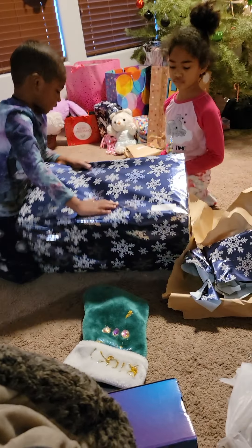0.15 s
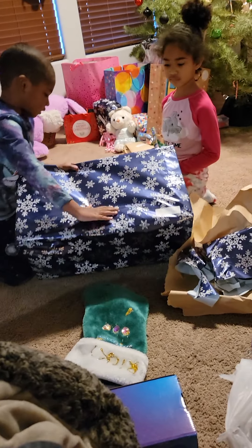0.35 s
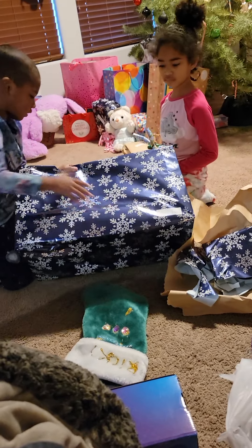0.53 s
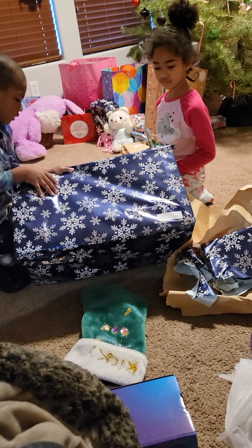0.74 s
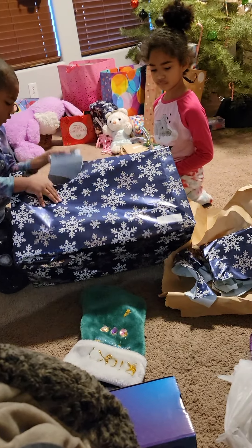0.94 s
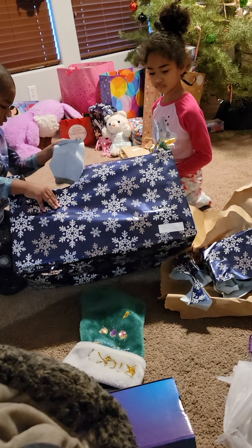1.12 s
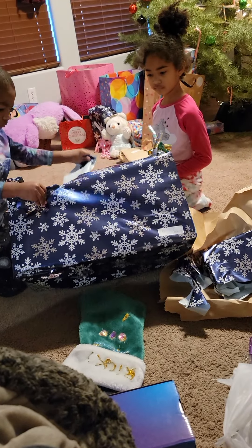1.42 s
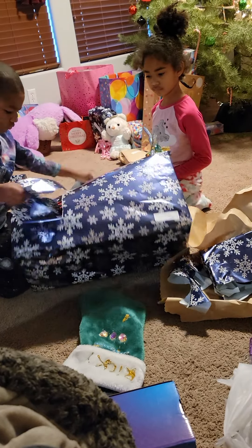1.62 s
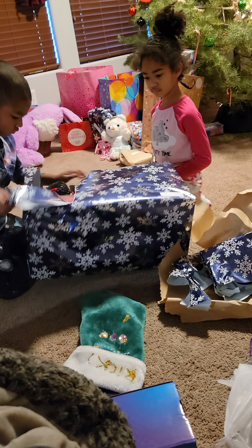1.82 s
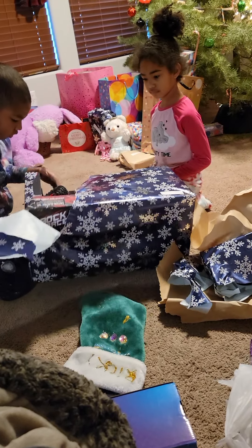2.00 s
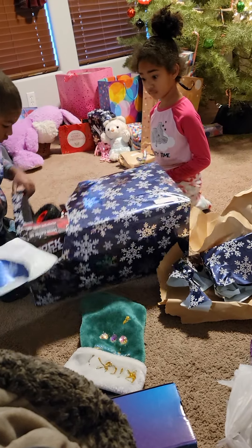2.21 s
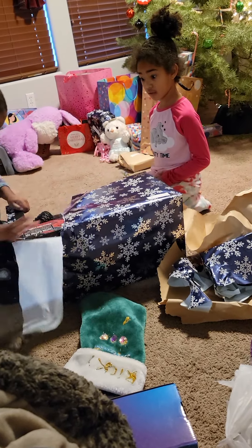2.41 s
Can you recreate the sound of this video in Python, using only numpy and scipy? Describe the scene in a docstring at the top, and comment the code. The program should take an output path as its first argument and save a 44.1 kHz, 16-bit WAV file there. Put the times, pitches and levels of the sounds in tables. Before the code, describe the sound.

Glossy wrapping paper crinkles in short, uneven grabs with sharp ticks. At about 1 second comes a loud rip with a hollow thump from the cardboard box, then a smaller tear at 1.3. Another loud rip and thump land at 1.7, followed by a longer, softer rasping tear from 1.9 to 2.1. The loose sheet flaps softly, and the crackling thins out by 2.5 in a carpeted living room.

```python
"""Glossy wrapping paper crinkles as it is gripped, then is ripped off a large cardboard box.
Each pull is a shower of tiny impulses: the sheet buckles (crackle), fibres and creases break (fizz),
and a running tear rasps by stick-slip. The same pulls drive the panels of the box, which drum
under the paper, and the loose sheet flaps. A carpeted living room reverberates briefly."""
import sys
import numpy as np
from scipy import signal
from scipy.fft import rfft, irfft, next_fast_len
from scipy.io import wavfile
from scipy.ndimage import uniform_filter1d

SR = 44100
rng = np.random.default_rng(int(sys.argv[2]) if len(sys.argv) > 2 else 0)


def write(x):
    x = np.atleast_2d(x).T
    wavfile.write(sys.argv[1], SR, np.round(np.clip(x, -1, 1) * 32767).astype(np.int16))


N = 112454
T = np.arange(N) / SR
FFT_SIZE = next_fast_len(2 * N)
HZ = np.maximum(np.arange(FFT_SIZE // 2 + 1) * SR / FFT_SIZE, 1)

# Spectral density of buckling paper: frequency_hz, level_db
CRACKLE_SPECTRUM = [(60, -62), (250, -21), (600, -6.5), (1100, 0.5), (1450, -9.5), (1800, 4), (2300, 2.5),
                    (2900, -0.5), (3900, 1.5), (5000, -4.5), (6500, -10), (9000, -14), (16000, -51)]


def from_db(db):
    """Amplitude ratio of a level in decibels."""
    return 10 ** (np.asarray(db) / 20)


def rms_one(x):
    """Normalisation to unit mean power."""
    return x / np.sqrt(np.mean(x ** 2) + 1e-20)


def at_hz(points, hz):
    """Interpolation of a table on a logarithmic frequency axis."""
    frequency, value = np.transpose(points)
    return np.interp(np.log(hz), np.log(np.maximum(frequency, 1)), value)


def colour(x, spectrum):
    """Minimum-phase filtering by a folded cepstrum; white input keeps its power."""
    cepstrum = irfft(np.log(rms_one(from_db(at_hz(spectrum, HZ)))), FFT_SIZE)
    cepstrum[1:FFT_SIZE // 2] *= 2
    cepstrum[FFT_SIZE // 2 + 1:] = 0
    return irfft(rfft(x, FFT_SIZE) * np.exp(rfft(cepstrum)), FFT_SIZE)[:N]


def ring(x, hz, t60_s):
    """Forced response of one damped resonator; white input keeps its power."""
    radius, angle = from_db(-60 / (t60_s * SR)), 2 * np.pi * hz / SR
    numerator = np.sqrt((1 - radius ** 2) / 2) * np.array([1, 0, -1])
    return signal.lfilter(numerator, [1, -2 * radius * np.cos(angle), radius ** 2], x + 1e-18)


def snaps(per_s, spread_db):
    """Shot noise: random impulses of uneven size over smooth friction noise, evened to steady power."""
    size = from_db(spread_db * np.minimum(rng.exponential(1, N), 4)) * rng.choice([-1, 1], N)
    impulses = rms_one(size * (rng.random(N) < per_s / SR))
    x = impulses + from_db(-6.5) * rng.standard_normal(N)
    return x / np.sqrt(uniform_filter1d(x * x, size=1400))


def burst(start_s, decay_s):
    """A dense cluster of micro-snaps merges into exponentially decaying noise."""
    age = T - start_s
    return rng.standard_normal(N) * (age >= 0) * np.exp(-np.abs(age) / decay_s)


def reflections():
    """Transfer function of one path: early scatter off box and floor, then a tail absorbed band by band."""
    # Reverberation time: frequency_hz, t60_s
    decay_times = [(100, .36), (500, 0.3), (2000, 0.32), (6000, 0.27), (15000, 0.22)]
    scatter_s, gap_s = 0.0023, 0.005
    t = T[:SR // 2]
    noise, tail = rfft(rng.standard_normal(len(t))), 0
    edges = np.r_[0, np.geomspace(200, SR / 2, num=9)]
    hz = np.arange(len(noise)) * SR / len(t)
    for low, high in zip(edges, edges[1:]):
        band = irfft(noise * (hz >= low) * (hz < high), len(t))
        tail = tail + band * from_db(-60 * t / at_hz(decay_times, (low + high) / 2))
    scatter = rng.standard_normal(len(t)) * np.exp(-t / scatter_s)
    path = rms_one(tail * (t > gap_s)) + from_db(1) * rms_one(scatter)
    return rfft(path, FFT_SIZE) / np.sqrt(len(t))


def living_room(x, wet, lag_s=0):
    """Direct and reflected sound reach the two channels, which differ in phase and level from band to band."""
    # Side against mid in the reflections: frequency_hz, level_db
    side_level = [(60, -28), (210, -24), (320, -7), (500, 0), (16000, 0)]
    # Phase lead of the left channel: frequency_hz, phase_rad
    left_lead = [(220, 0), (290, .25), (380, 1.0), (520, 2.3), (700, 2.5), (1100, 1.9), (2100, 2.1),
                 (3200, 2.9), (5500, 3.8), (9000, 7), (16000, 13)]
    # Left channel against right: frequency_hz, level_db
    left_level = [(60, 1.9), (150, 2.5), (350, -4.5), (700, 4), (1400, 0.5), (2600, -3.5), (5000, 2),
                  (9000, 3.5), (15000, 0.5)]
    sides, width = np.array([[1], [-1]]), from_db(at_hz(side_level, HZ))
    room = wet * (reflections() + sides * width * reflections()) / np.sqrt(1 + width ** 2)
    heard = rfft(x, FFT_SIZE) * (1 + room) / np.sqrt(1 + np.mean(np.abs(room) ** 2))
    heard[1] *= np.exp(-1j * (at_hz(left_lead, HZ) + 2 * np.pi * HZ * lag_s))
    return irfft(heard * from_db(sides * at_hz(left_level, HZ) / 2), FFT_SIZE)[:, :N]


def flapping(drive):
    """The loose sheet displaces air, radiating long waves that reach both microphones alike."""
    # Spectral density of the flapping: frequency_hz, level_db
    flap_spectrum = [(14, -69), (27, -15), (42, -6), (60, -1.5), (85, 0.5), (120, 4), (170, -5), (260, -3),
                     (800, -50.5)]
    return colour(drive, flap_spectrum)


def cardboard(drive):
    """Forced vibration: the box drums and rings in its modes; each tug bends a panel with a thump."""
    # Tugs of the paper on the box: start_s, level_db
    tugs = [(.66, -31.5), (0.787, -32), (1.036, -18), (1.077, -35), (1.666, -18.5), (1.713, -27)]
    # Panel modes: pitch_hz, level_db, t60_s
    modes = [(119.4, -14.5, .3), (242.5, -5.5, 0.1), (330.4, -8, 0.064), (351, -1.5, 0.18),
             (396.1, -2, 0.13), (427, -9, .1), (480, -1.5, 0.17)]
    # Broadband response of the box: frequency_hz, level_db
    box_spectrum = [(25, -34), (80, -9.5), (160, -5.5), (240, -2), (330, 6), (430, 0.5), (600, -9),
                    (1000, -18), (3000, -44)]
    thump_hz, thump_decay_s = 322, 0.0088
    ages = [(np.maximum(T - start, 0), from_db(db)) for start, db in tugs]
    thumps = sum(gain * np.sin(2 * np.pi * thump_hz * age) * np.exp(-age / thump_decay_s)
                 for age, gain in ages)
    drive = drive + sum(from_db(db) * burst(start, decay_s=0.0045) for start, db in tugs)
    panels = sum(from_db(db) * ring(drive, hz, t60_s) for hz, db, t60_s in modes)
    return 0.5 * (colour(drive, box_spectrum) + from_db(-4.5) * panels) + thumps


def creases():
    """Snap-through buckling: a crease flips with a bright tick and a duller pop."""
    # Single creases flipping: start_s, tick_db, pop_db
    flips = [(0.022, -37, -22), (0.191, -37, -40), (0.2316, -31, -25), (0.3897, -26, -19),
             (0.4527, -22, -34), (.4975, -27, -20), (0.5907, -45, -36), (.745, -48, -32), (.7585, -36, -49),
             (0.7838, -24, -14), (0.8448, -46, -25), (0.856, -44, -23), (0.876, -27.5, -42),
             (0.971, -26, -33), (1.0055, -11.5, -10.5), (1.0333, -28, -16), (1.079, -20, -13),
             (1.479, -18.5, -31), (1.5608, -22.5, -36), (1.6143, -22, -17.5), (1.6724, -15, -15),
             (2.016, -33, -14), (2.217, -33, -19), (2.27, -38, -34)]
    # Spectral density of a tick: frequency_hz, level_db
    tick_spectrum = [(800, -28), (3000, -12), (6000, 2.5), (9000, 1.5), (12500, 6), (16000, -7.5)]
    ticks = sum(from_db(db) * burst(start, decay_s=0.002) for start, db, _ in flips)
    pops = sum(from_db(db) * burst(start, decay_s=0.002) for start, _, db in flips)
    return colour(ticks, tick_spectrum) + colour(pops, CRACKLE_SPECTRUM)


def rasp():
    """Stick-slip impulses of a running tear excite the resonances of the taut sheet."""
    # Runs of the tear: start_s, length_s, level_db
    runs = [(1.013, 0.09, -34), (1.654, 0.063, -30), (2, .11, -25), (2.25, 0.043, -30.5)]
    # Response of the taut sheet: frequency_hz, level_db
    taut_spectrum = [(500, -46), (1400, -16), (1720, -1), (2050, -5), (2450, 0), (2850, -15), (6000, -33.5)]
    edge_s = 0.008
    pull = sum(from_db(db) * np.clip(np.minimum(T - start, start + length - T) / edge_s, 0, 1)
               for start, length, db in runs)
    return colour(pull * snaps(per_s=1300, spread_db=2), taut_spectrum)


def pull_envelopes(pulls, release_s):
    """Incoherent pulls add in power: a gain curve for each of four layers, and the mean facet pitch."""
    power, pitch, weight = np.zeros((4, N)), 0, 0
    for start, rise, hold, hz, *levels in pulls:
        release = np.exp(-np.clip((T - start - rise - hold) / release_s, 0, 20))
        shape = np.clip((T - start) / rise, 0, 1) * release
        power += (from_db(levels)[:, None] * shape) ** 2
        pitch += hz * (shape + 1e-9)
        weight += shape + 1e-9
    return np.sqrt(power), pitch / weight


def facets(pitch_hz, per_s, spread_db):
    """Damped free vibration: each snap rings a facet at its own pitch; the sum is evened in power."""
    decay_cycles, spread_octaves = 2.9, 0.29
    onset = np.flatnonzero(rng.random(N) < per_s / SR)[:, None]
    size = from_db(spread_db * np.minimum(rng.exponential(1, N)[onset], 4))
    detune = 2 ** (spread_octaves * rng.standard_normal(N)[onset])
    age = np.arange(256)
    cycles = pitch_hz[onset] * detune * age / SR
    grains = (-1.) ** onset * size * np.sin(2 * np.pi * cycles) * np.exp(-cycles / decay_cycles)
    x = np.bincount((onset + age).ravel(), grains.ravel(), N)[:N]
    return x / np.sqrt(uniform_filter1d(x * x, size=1400) + 1e-4)


def paper(gains, pitch_hz, per_s, spread_db):
    """Impulsive release of elastic energy gives the sheet's sound and the drives of box and flapping."""
    crackle, fizz, box, flap = gains
    clicks = snaps(per_s, spread_db)
    # Spectral density of breaking fibres: frequency_hz, level_db
    fizz_spectrum = [(400, -39), (1500, 2.5), (4000, -2), (6000, 2.5), (8000, -1), (10000, -3.5),
                     (12500, 0), (16000, -4)]
    buckling = 1.03 * colour(crackle * snaps(per_s, spread_db), CRACKLE_SPECTRUM)
    ringing = from_db(-4.5) * crackle * facets(pitch_hz, per_s, spread_db)
    sheet = buckling + ringing + colour(fizz * clicks, fizz_spectrum)
    return np.array([sheet, box * clicks, flap * rng.standard_normal(N)])


def spread_over_sheet(x, patches):
    """An extended source: the snapping jumps between patches, each with its own path through the room."""
    activity = uniform_filter1d(uniform_filter1d(rng.standard_normal((patches, N)), size=260), size=180)
    active = np.argmax(activity, axis=0)
    lags_s = np.linspace(-1, 1, patches) * 50e-6
    return sum(living_room(x * uniform_filter1d(1. * (active == k), size=40), wet=0.72, lag_s=lag)
               for k, lag in enumerate(lags_s))


def crumpling():
    """Buckling under the hands gives sparser, uneven snaps; the sheet never lies quite still."""
    # Grips and drags: start_s, rise_s, hold_s, pitch_hz, crackle_db, fizz_db, box_db, flap_db
    grips = [(.02, 0.0073, 0.027, 3020, -32, -42, -43.5, -53),
             (.172, 0.012, 0.032, 1970, -31.5, -39, -34, -41),
             (.226, .006, 0.037, 2300, -27, -30.5, -33.5, -38),
             (.285, 0.0086, 0.054, 2370, -33, -34, -35.5, -49.5),
             (.384, 0.0051, 0.015, 2200, -30, -32, -33, -42),
             (.453, 0.0036, .025, 1860, -34.5, -41, -40, -51),
             (.49, 0.0055, 0.023, 2380, -32.5, -36, -36.5, -61.5),
             (.575, 0.019, 0.028, 2130, -30.5, -41.5, -43.5, -61),
             (.738, 0.021, 0.034, 2120, -32.5, -41, -35, -63),
             (.778, 0.0024, 0.017, 2350, -23.5, -29.5, -29.5, -34),
             (.84, .006, 0.028, 3170, -35.5, -49, -44, -46.5),
             (.90, 0.065, 0.078, 2120, -29.5, -35.5, -37.5, -48),
             (1.13, 0.021, 0.068, 2030, -36.5, -53, -39, -47),
             (1.252, 0.018, 0.031, 2040, -29.5, -35, -36.5, -43.5),
             (1.40, 0.022, 0.042, 1820, -35.5, -41.5, -54, -66),
             (1.464, 0.011, 0.011, 1950, -27, -36, -34, -63),
             (1.552, 0.01, 0.06, 2230, -29.5, -32, -36, -68),
             (1.598, .012, 0.032, 2100, -32.5, -35, -32, -56),
             (1.81, 0.021, 0.08, 2320, -31, -36.5, -42.5, -50),
             (2.115, 0.015, 0.084, 2010, -35.5, -39, -48, -63),
             (2.205, .01, .016, 1920, -28.5, -30.5, -43, -67),
             (2.254, 0.0069, 0.0091, 2060, -29.5, -38, -56, -64),
             (2.358, 0.0098, 0.068, 1840, -39.5, -57, -64.5, -54),
             (2.455, 0.021, 0.03, 1680, -39, -69, -43, -40.5)]
    # Constant faint rustle: crackle_db, fizz_db, box_db, flap_db
    resting_db = (-46.5, -59, -46.5, -53)
    gains, pitch_hz = pull_envelopes(grips, release_s=0.023)
    return paper(np.hypot(gains, from_db(resting_db)[:, None]), pitch_hz, per_s=1400, spread_db=4)


def tearing():
    """Fracture: fibres break in quick succession, giving a dense shower of snaps."""
    # Long tears: start_s, rise_s, hold_s, pitch_hz, crackle_db, fizz_db, box_db, flap_db
    rips = [(.993, 0.01, 0.062, 1920, -20.5, -24, -26.5, -38),
            (1.065, 0.013, 0.048, 2180, -20, -23, -26, -43),
            (1.303, 0.022, 0.044, 2220, -25, -26.5, -32, -64),
            (1.664, 0.0048, 0.047, 1980, -21.5, -27, -37, -39.5),
            (1.71, 0.026, 0.036, 3560, -20, -22, -34.5, -43),
            (1.89, 0.048, 0.17, 2160, -30.5, -29, -48, -69),
            (2.007, 0.0029, 0.089, 2200, -28.5, -29.5, -43, -46.5)]
    gains, pitch_hz = pull_envelopes(rips, release_s=0.024)
    return paper(gains, pitch_hz, per_s=4500, spread_db=3)


def scene():
    """Superposition of sheet, creases and box in the room, with the deep flapping heard direct."""
    sheet, box_drive, flap_drive = tearing() + crumpling()
    return (spread_over_sheet(sheet + rasp(), patches=7)
            + living_room(creases(), wet=1)
            + living_room(cardboard(box_drive), wet=from_db(-6))
            + flapping(flap_drive))


def record(dry):
    """Band limiting: an elliptic low-pass cuts the highest treble steeply."""
    cutoff_hz = 15900
    return signal.sosfilt(signal.ellip(10, .1, 80, cutoff_hz, fs=SR, output="sos"), dry)


dry = scene()
out = record(dry)
write(out)
```